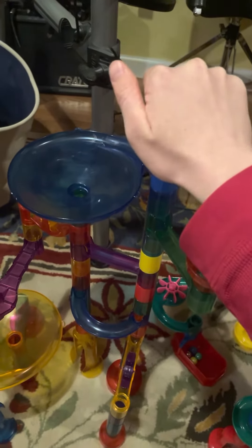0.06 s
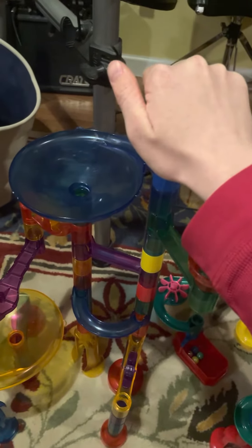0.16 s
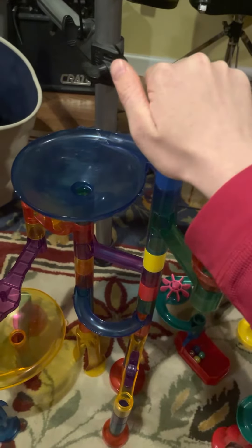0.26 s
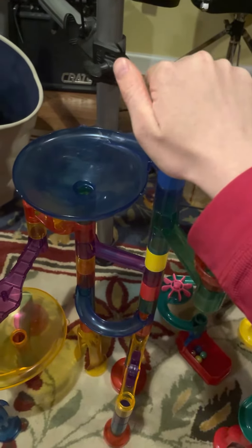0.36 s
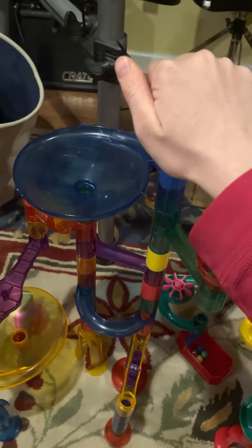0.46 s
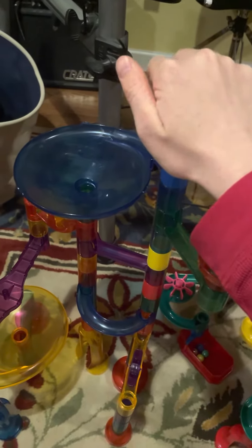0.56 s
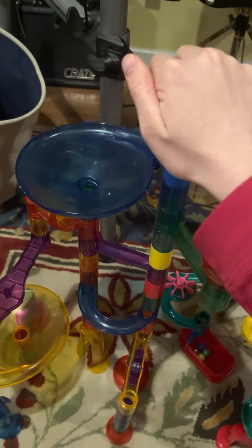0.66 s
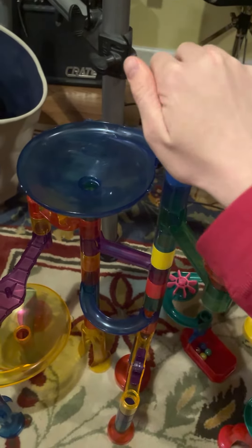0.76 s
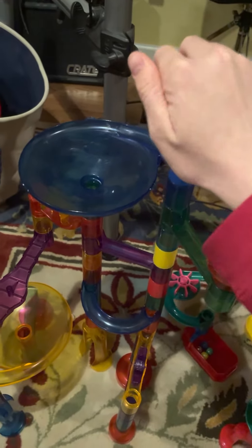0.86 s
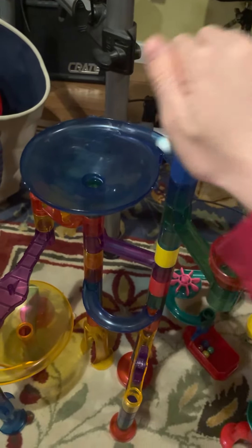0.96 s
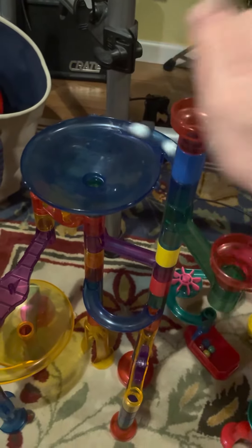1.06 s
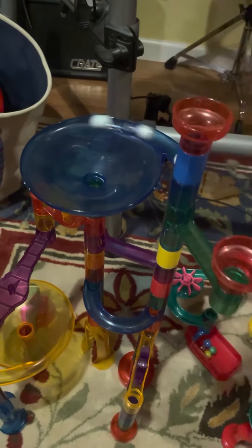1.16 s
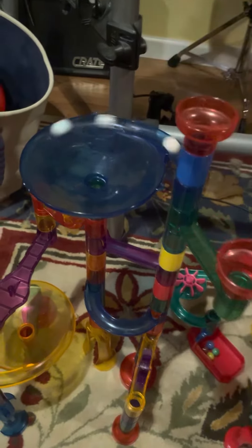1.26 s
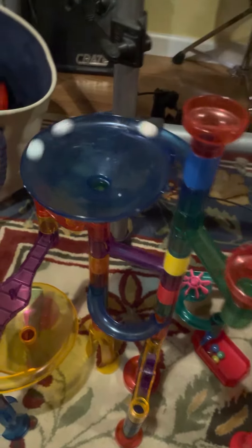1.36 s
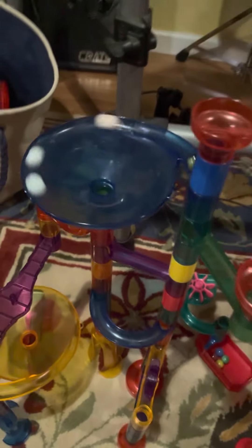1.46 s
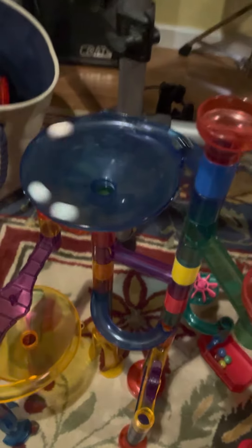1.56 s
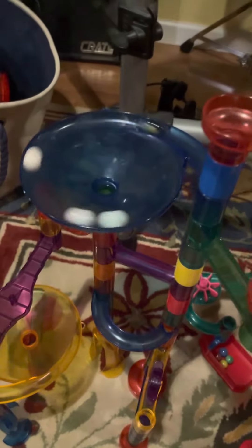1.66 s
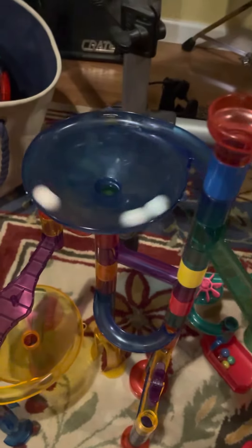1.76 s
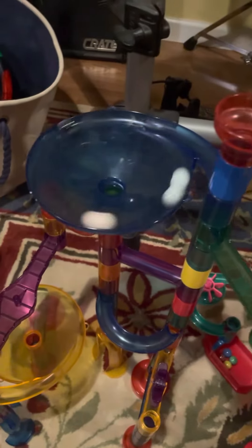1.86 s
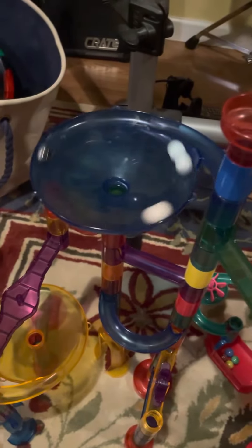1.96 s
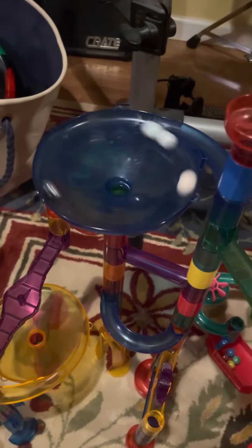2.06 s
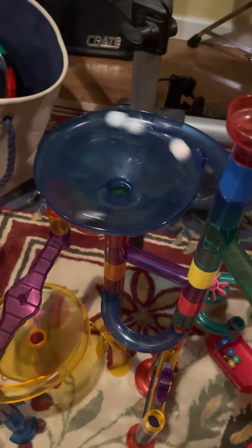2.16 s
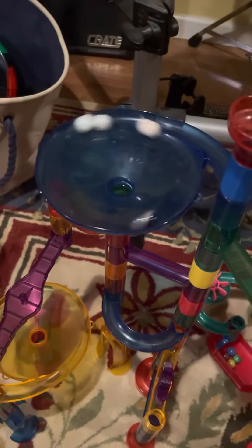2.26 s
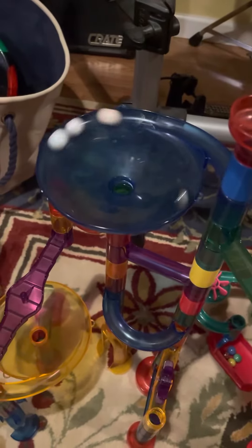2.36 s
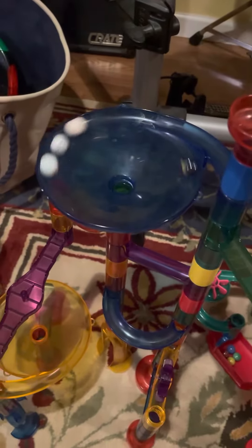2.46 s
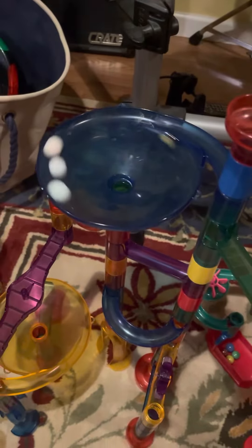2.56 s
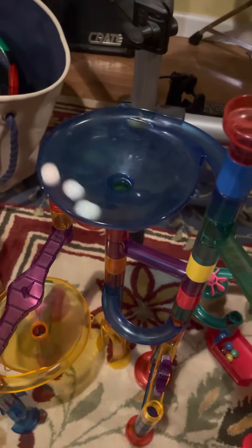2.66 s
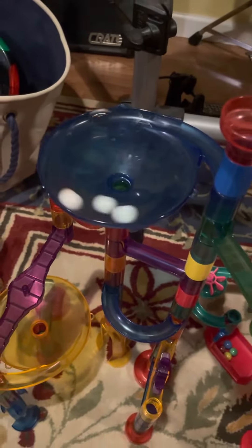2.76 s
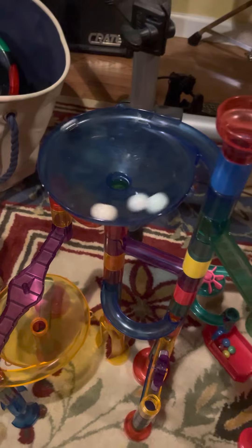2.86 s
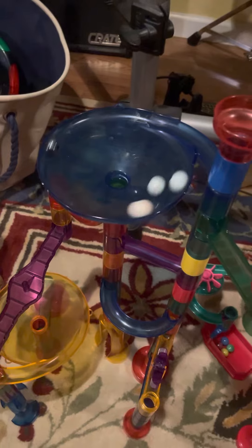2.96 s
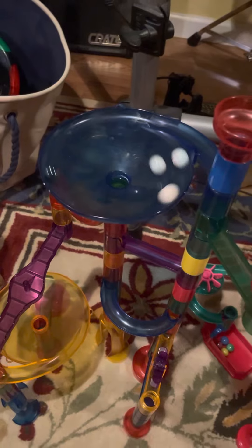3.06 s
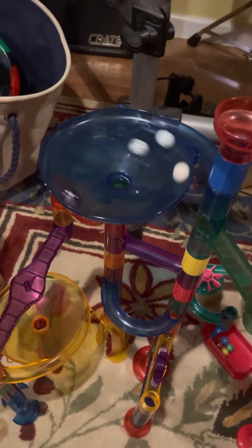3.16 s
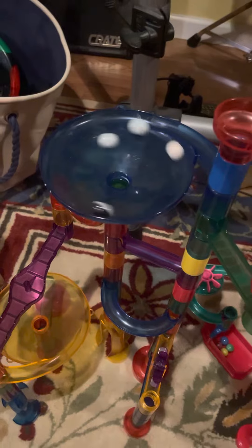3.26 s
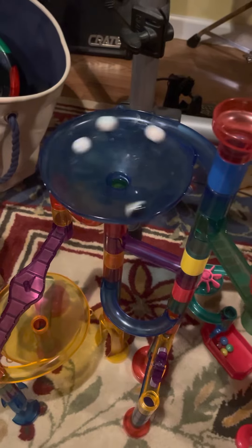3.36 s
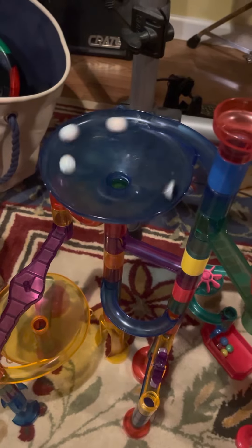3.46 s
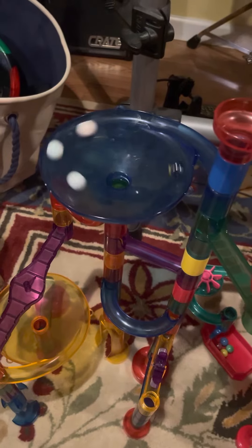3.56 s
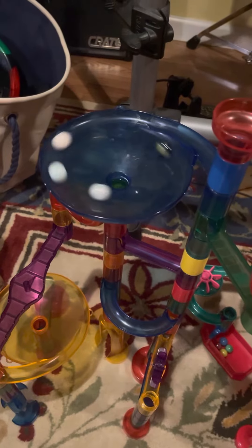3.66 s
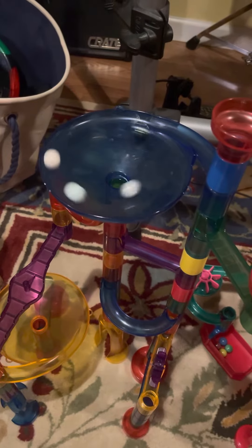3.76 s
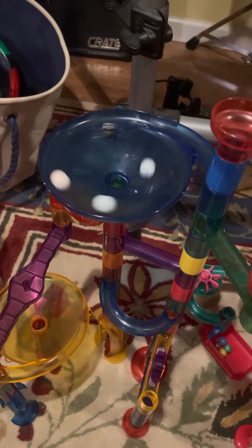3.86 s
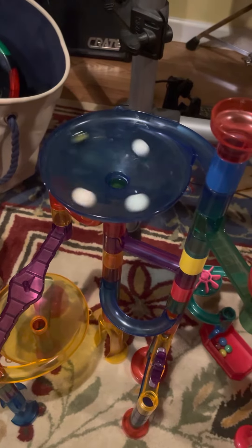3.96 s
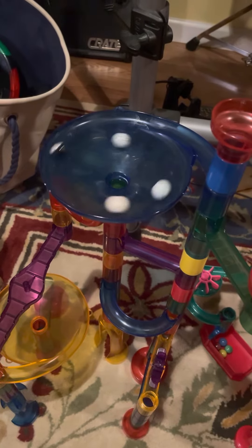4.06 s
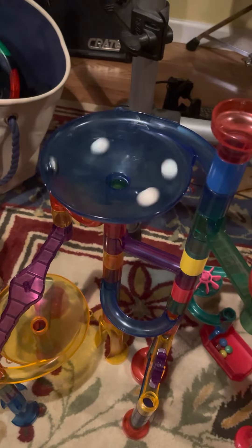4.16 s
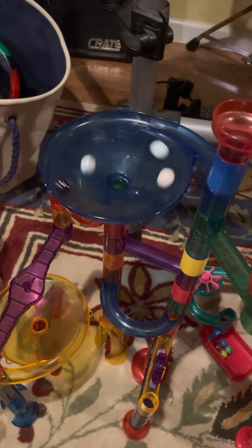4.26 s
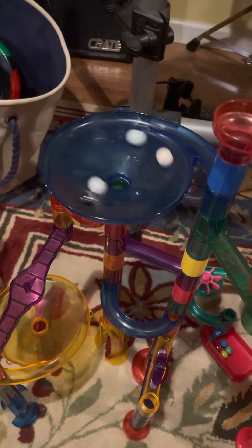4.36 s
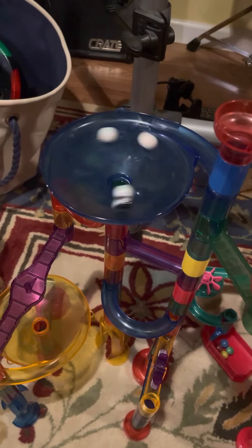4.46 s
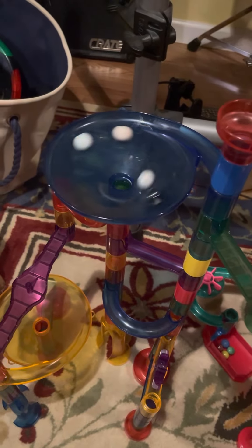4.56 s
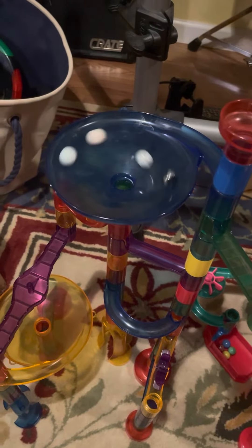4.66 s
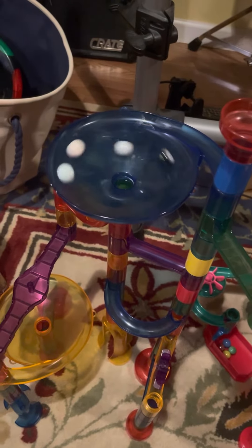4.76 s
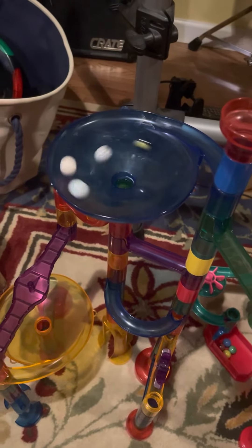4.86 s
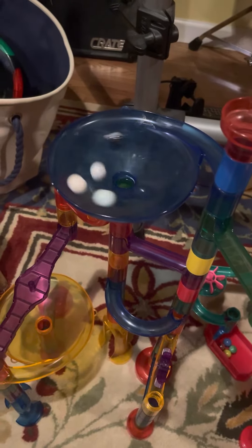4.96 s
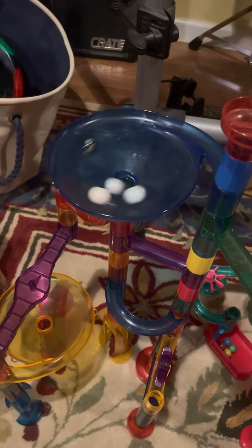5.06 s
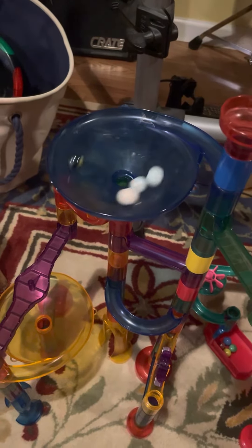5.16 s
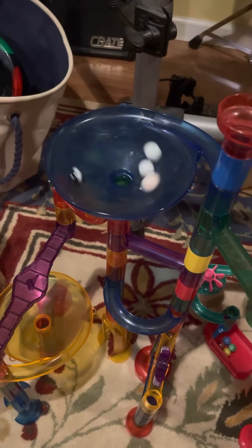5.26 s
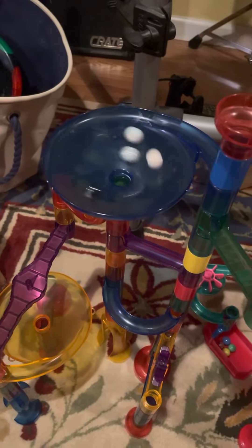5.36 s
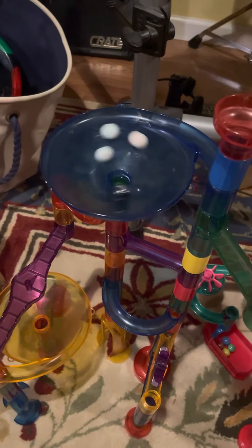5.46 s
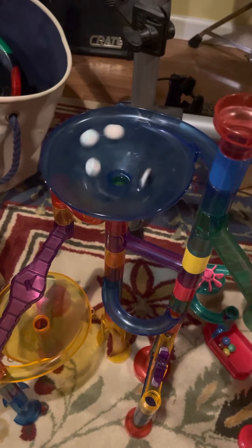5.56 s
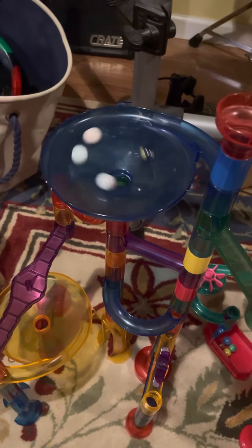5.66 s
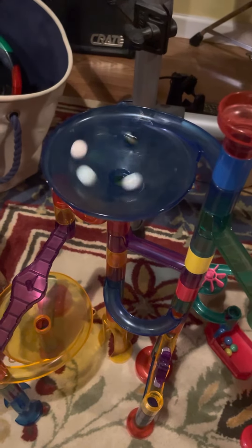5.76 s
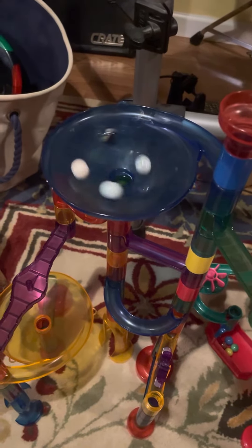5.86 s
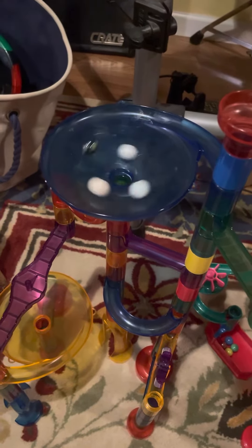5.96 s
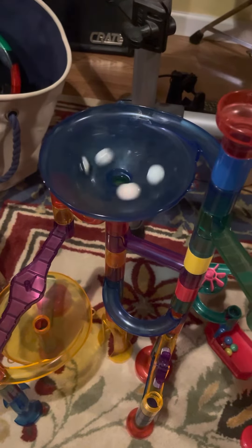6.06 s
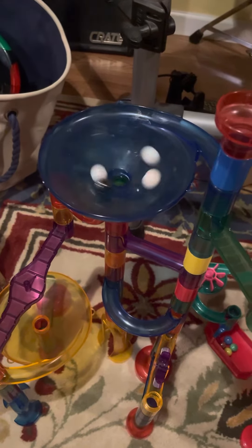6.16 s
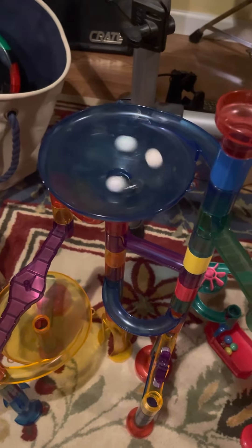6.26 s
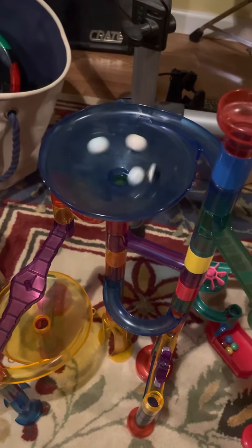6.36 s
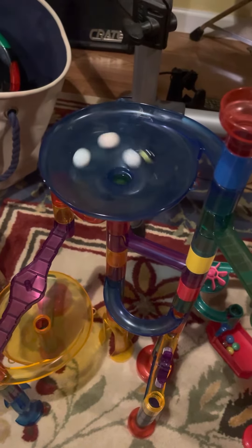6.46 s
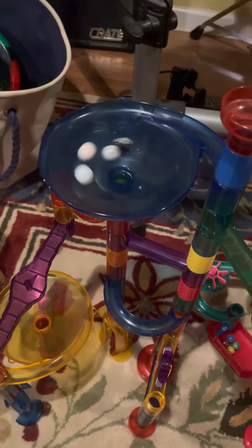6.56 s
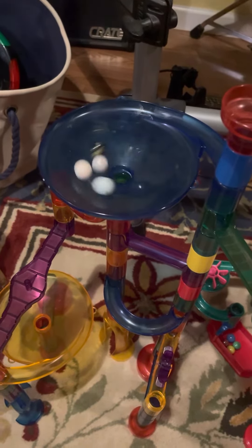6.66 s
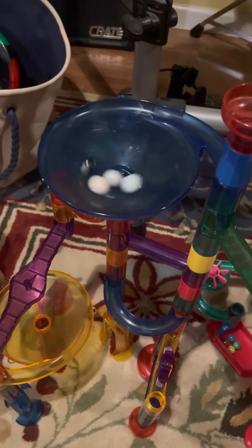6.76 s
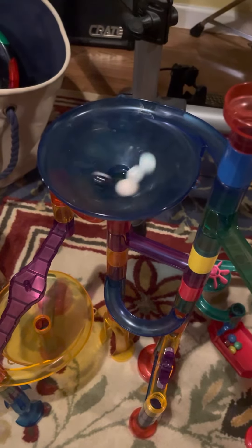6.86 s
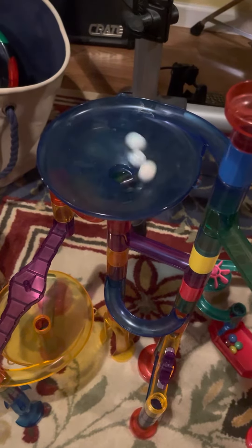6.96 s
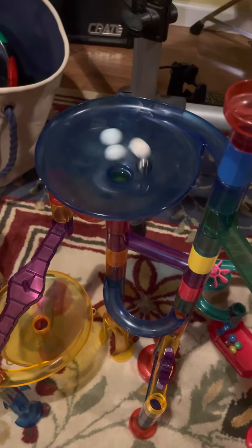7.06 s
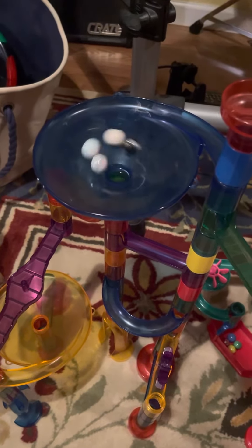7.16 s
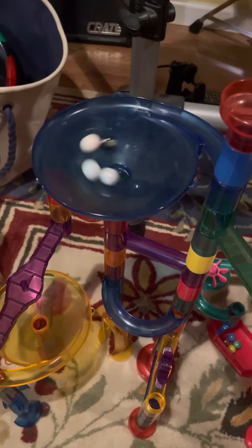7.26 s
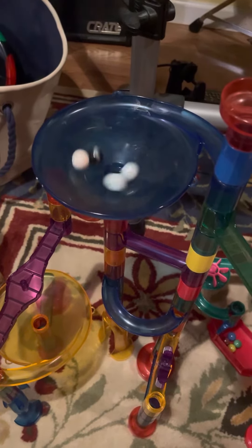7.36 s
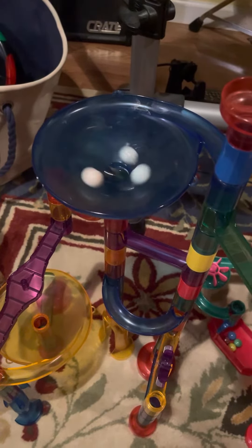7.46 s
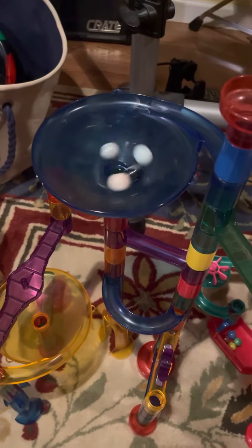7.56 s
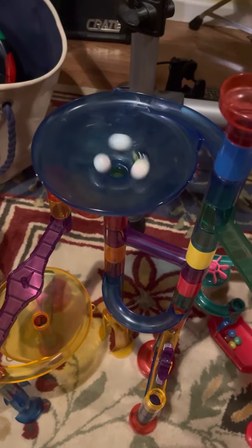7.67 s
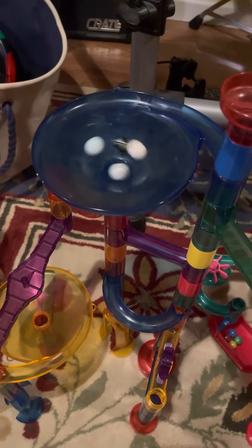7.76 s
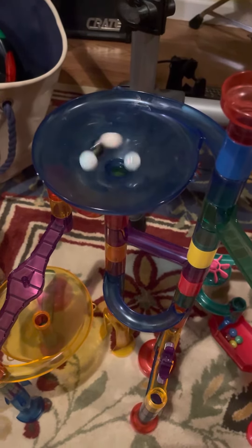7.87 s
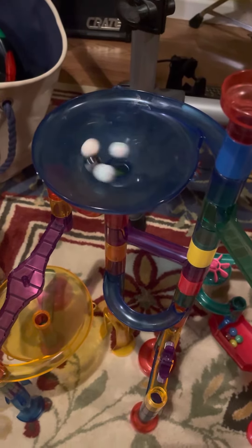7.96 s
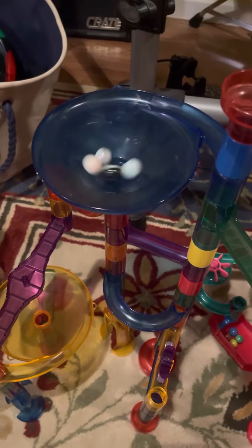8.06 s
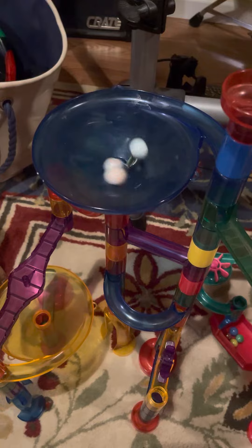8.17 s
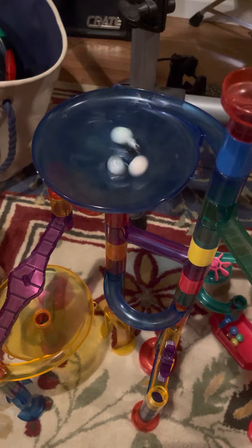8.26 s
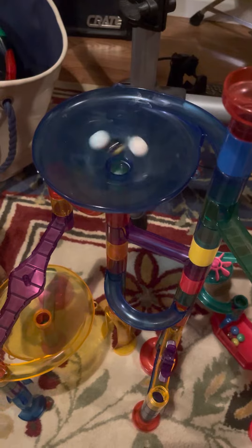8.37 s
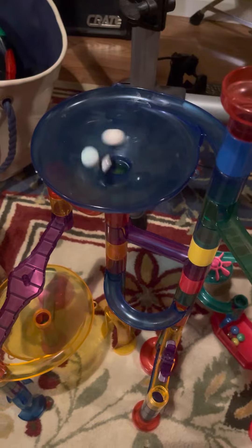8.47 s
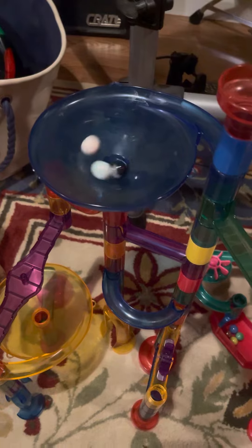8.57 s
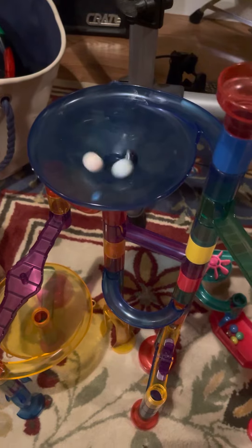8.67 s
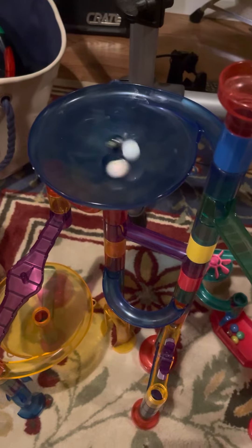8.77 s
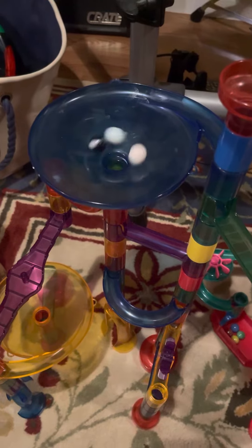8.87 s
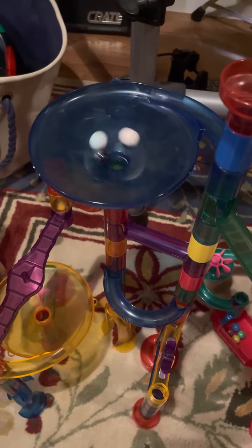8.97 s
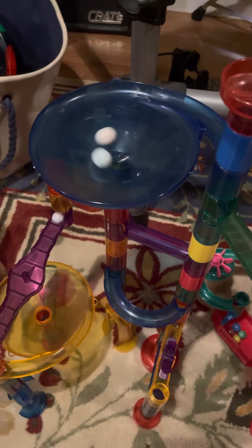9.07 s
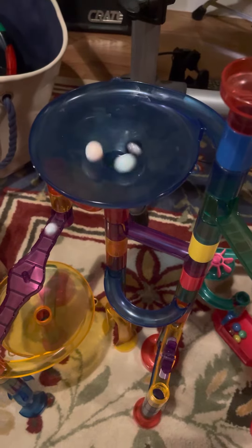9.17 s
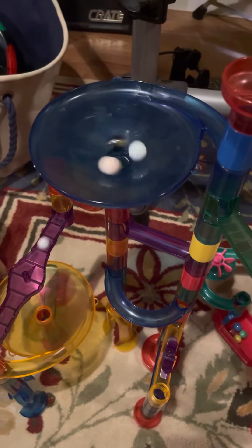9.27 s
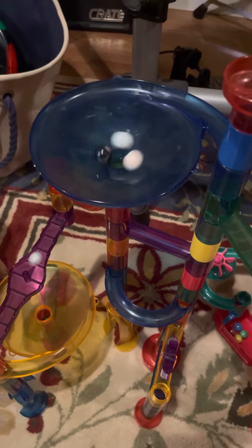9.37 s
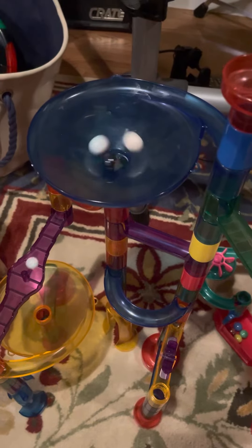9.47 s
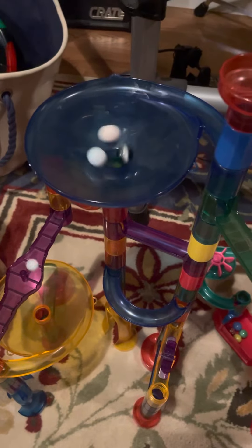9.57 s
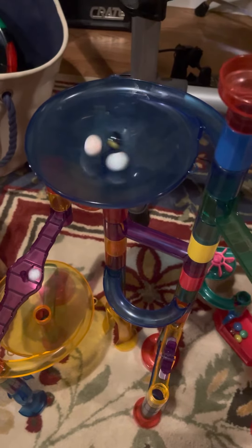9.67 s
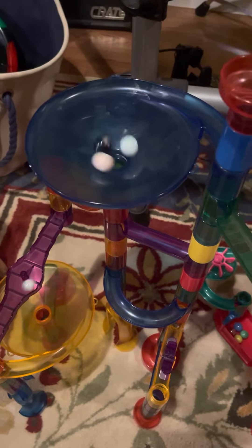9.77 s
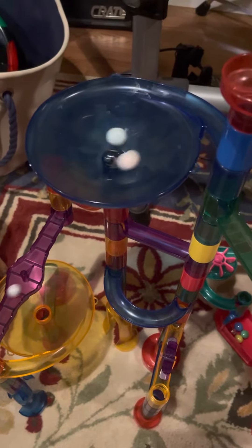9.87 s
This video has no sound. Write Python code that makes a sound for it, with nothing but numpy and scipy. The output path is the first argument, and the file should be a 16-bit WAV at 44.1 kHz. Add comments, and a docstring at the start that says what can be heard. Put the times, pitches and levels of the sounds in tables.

```python
"""Low rumble of a hand-held microphone and faint hiss run throughout in a carpeted room.
Glass marbles are let go and clack down a plastic chute: ringing pieces, cracks, glass pings; dull bumps come and go.
They circle a funnel bowl towards its hole, the rolling's colour shifting: roughness drives the bowl's modes,
collisions tick and knock. Late on they crowd and clack down the tubes.
Bounces add rattle; a shifting diffuse room answers the marbles."""
import sys
import numpy as np
from scipy import signal
from scipy.fft import rfft, irfft, next_fast_len
from scipy.io import wavfile
from scipy.ndimage import uniform_filter1d

SR = 44100
rng = np.random.default_rng(int(sys.argv[2]) if len(sys.argv) > 2 else 0)


def wrap_up_sound(samples):
    """Save the sound to the file named by the first command line argument, as 16-bit audio."""
    columns = np.atleast_2d(samples).T
    # keep every value between -1 and 1, then stretch to whole-number steps
    tamed = np.clip(columns, -1, 1)
    steps = np.round(tamed * 32767).astype(np.int16)
    wavfile.write(sys.argv[1], SR, steps)


N = 437472
TIME = np.arange(N) / SR

# blend of the bowl's colour: time_s, rim_share (1 rim colour .. 0 hole colour)
BOWL_COLOUR = [(0.5, 0.64), (2.0, 1), (3.5, 0.92), (5.0, 0.017), (7.0, 0.15), (9.9, 1)]
# bowl resonances, relative levels: mode_hz, width_hz, rim_db, hole_db
BOWL_MODES = [(532, 44, -8, -9), (571.8, 33.5, -5, -3), (631.3, 38, -6, -2), (663.2, 40, -7.5, -5),
              (712, 61, -8.5, -11), (831, 100, -10, -14), (960, 113, -5.5, -10.5), (1051, 75, -7.5, -10),
              (1242, 110, -3.5, -9.5), (1342, 107, -4, -4), (1469, 213, -6, -0.5), (1596, 137, -6, -2.5),
              (1770, 190, -11, -3.5), (2025, 116, -12, -3.5), (2177, 173, -15, -11),
              (2344, 154, -15.5, -17.5), (2567, 140, -28.5, -22.5), (2860, 370, -20.5, -20.5),
              (3250, 210, -33.5, -29.5), (4170, 610, -32.5, -28), (5390, 170, -32.5, -26),
              (264, 300, -17.5, -14)]
# drops onto plastic; snap and ping relative to strength: start_s, strength_db, snap_db, ping_db, pitch_hz
DROPS = [(0.454, -30.5, -6, -6.5, 1260), (0.4698, -26.5, -7, -9, 1650), (0.4939, -31, -5.5, -9, 2050),
         (0.5109, -36, -7, -6.5, 1500), (0.5258, -33.5, -6, -5.5, 1530), (0.553, -33.5, -1, -4, 2080),
         (0.5584, -26.5, -8, -5.5, 1936), (0.576, -39, 8, -9, 1630), (0.5836, -42, 3, -4.0, 1610),
         (0.594, -21.5, -6, -4.5, 1680), (0.6071, -32.5, -8, -9, 2140), (0.6249, -32, -2, 4, 1410),
         (0.632, -23, -3.5, -3, 1616), (0.665, -27, -12.5, -6, 1960), (0.679, -26, -11, -12, 1790),
         (0.7265, -38, -17, -18, 1660), (0.7439, -25.0, -10, -9, 1700), (0.7507, -23.5, -6, -3.5, 1930),
         (0.776, -32, -3, -3, 1490), (0.7857, -28.5, -14, -10, 2110), (0.7947, -29.5, -9, -8.5, 1750),
         (0.803, -32.5, -6, -6, 1730), (0.8236, -31, -15, -19.0, 2130), (0.8364, -22.5, -6, -10.5, 1870),
         (0.8971, -33.5, -1, -3, 2130), (0.9025, -24.5, -13.0, -11.5, 2050),
         (0.9135, -30.5, -2.5, -14, 1450), (0.9182, -35, -3.5, -11, 1500), (0.9232, -31, -6, -8.5, 1940),
         (0.9562, -31.5, -6, -19, 1420), (0.9767, -38, -5, -7, 2110), (0.9851, -31.5, -2.5, -12.5, 1930),
         (0.998, -42, -16, -9, 1400), (1.031, -45, -7, -6, 1530), (1.0574, -28.5, -5, -11, 2030),
         (1.0703, -33, -4.5, -11.5, 1460), (1.112, -29, -8, -15, 1090), (1.1863, -32, -11, -15, 1230),
         (8.193, -34.5, -13.5, -17, 1660), (8.2612, -37.5, -14.5, -13, 1830),
         (8.2681, -32.0, -19, -24, 1570), (8.2967, -32.5, -16, -14, 2000), (8.3042, -39.5, -3.5, -2, 1870),
         (8.3121, -31.5, -14.0, -15, 2040), (8.3427, -27, -15, -10, 1990), (8.3725, -21.5, -11, -11, 1520),
         (8.3845, -24.5, -13, -11.0, 2000), (8.4272, -18.5, -8.5, -11, 1390),
         (8.4379, -38, -10, -2.5, 1890), (8.4694, -26, -16.0, -25.0, 1480), (8.4885, -37, -15.5, -15, 1740),
         (8.5882, -27, -9, -17.5, 1400), (8.658, -41.5, -15, -14, 990), (8.7407, -35, -7.5, -19, 1760),
         (8.7675, -29, -14, -17, 1550), (8.852, -26.5, -2.5, -7.5, 3220), (8.8782, -34.5, -10, -16, 1550),
         (8.897, -44, -10, -8.5, 1610), (8.9268, -32, -13, -6, 1480), (8.937, -25.5, -14, -19, 1510),
         (8.9606, -27.5, -2, -9, 1460), (9.0044, -33, -3, -10, 1590), (9.132, -35.5, -8, -9, 1370),
         (9.2278, -31.5, -7.5, -10, 2260), (9.316, -30.5, -4.5, -11.5, 1810),
         (9.3823, -33.5, -1, -10.5, 2570), (9.4075, -39.5, -4, -6, 1540), (9.4592, -42.5, -4, -11.5, 1490),
         (9.5738, -42, -4, -15, 1530), (9.5917, -33, -11, -14.5, 2610), (9.723, -37.5, -23.5, -32.5, 1390),
         (9.7505, -30.5, -3.5, -11, 1590), (9.8813, -51, -3, 0, 1610), (9.893, -29.0, -5, -14, 1510)]
# collisions in the bowl, relative levels: start_s, glass_tick_db, bowl_knock_db
COLLISIONS = [(1.2126, -59, -27), (1.4056, -47.5, -30), (1.496, -47, -50.5), (1.6241, -55, -27.5),
              (1.7965, -66, -28), (1.9535, -52, -56.5), (2.0246, -46, -35), (2.1574, -39.5, -26),
              (2.203, -58, -44), (2.3231, -46, -25), (2.7103, -43.5, -31.5), (2.812, -54, -36.5),
              (3.49, -64, -33), (4.282, -59, -35), (4.411, -44, -50), (4.49, -54.5, -33.5),
              (4.757, -54, -40), (4.857, -55, -43), (5.1227, -51, -35), (5.337, -64, -42),
              (5.795, -53.5, -34.5), (6.218, -54, -33), (6.336, -67, -36), (6.405, -54.5, -36),
              (6.5087, -50, -33), (6.579, -52.5, -40), (6.728, -54, -35), (6.824, -57, -36),
              (6.8504, -53, -34), (6.8792, -51.5, -31.5), (6.966, -56, -43), (7.016, -57, -32.5),
              (7.0646, -50, -32), (7.1284, -51, -32), (7.3009, -53.5, -35.5), (7.439, -57, -37.5),
              (7.471, -51.5, -33), (7.5592, -52, -32), (7.603, -47, -41), (7.98, -75, -38.5),
              (8.0365, -56, -36), (8.0755, -46.5, -51.5), (8.1403, -75, -37.5), (9.8443, -48.5, -54)]
# ring of the plastic pieces, relative levels: mode_hz, width_hz, level_db
PLASTIC_MODES = [(561, 37, -6.5), (740, 80, -10), (972, 120, -3.5), (1420, 160, 2), (1644, 390, 2.5),
                 (2074, 120, -2.5), (2395, 220, -3), (2710, 840, 0), (3110, 420, 1.5), (4150, 1660, 0),
                 (4970, 1400, -12.5), (6230, 230, -18.5), (10100, 2900, -27)]
# glass colour: freq_hz, relative_db
GLASS_COLOUR = [(1500, -2.5), (3500, 6), (5000, -1), (6000, 8), (7000, -5), (8000, -18.5), (10000, -20.5),
                (12500, -39), (15000, -39.5)]
# bumps on the microphone: start_s, level_db, start_pitch_hz, fade_s, scuff_db
MIC_BUMPS = [(0.752, -22.5, 298, 0.13, -45), (0.871, -19, 228, 0.056, -42), (0.893, -23.5, 242, 0.11, -49),
             (1.057, -22.5, 305, 0.099, -52), (4.542, -19.5, 223, 0.033, -56),
             (5.213, -35, 270, 0.036, -45.5), (5.285, -33, 268, 0.052, -45), (5.809, -18, 249, 0.037, -34),
             (5.834, -17, 197, 0.059, -46), (5.881, -14, 430, 0.06, -45), (6.922, -35, 386, 0.05, -41),
             (6.957, -25, 343, 0.036, -47), (8.204, -30.5, 109, 0.089, -65),
             (8.279, -21.5, 454, 0.042, -36.5), (8.572, -30.5, 204, 0.03, -48.5),
             (8.775, -26, 156, 0.084, -55), (9.305, -25, 231, 0.024, -47), (9.359, -21, 403, 0.022, -58),
             (9.897, -30.5, 349, 0.031, -37)]
# rumble colour: freq_hz, relative_db_per_hz
RUMBLE_COLOUR = [(20, -28.5), (32, -15.5), (42, -1.5), (57, -1.5), (72, -9.5), (100, -20), (140, -27),
                 (200, -36.5), (300, -51.5), (1100, -70), (6000, -100)]
# hiss colour: freq_hz, relative_db_per_hz
HISS_COLOUR = [(300, 6.5), (750, -1.5), (1150, 2), (1600, -4), (2100, 1), (2800, -10.5), (3400, 5.5),
               (3800, -8.5), (6000, -18.5), (14000, -12.5)]
# port level difference: freq_hz, left_minus_right_db
PORT_BALANCE = [(100, -1.5), (450, -4), (580, -6.5), (800, -10), (1050, 2.5), (1230, 4), (1600, 3),
                (1950, -6.5), (2180, 12.5), (2500, -7), (4200, -2.5), (5300, 1), (9000, -0.5)]
# port phase difference: freq_hz, left_lead_rad
PORT_LEAD = [(30, 0), (70, -.15), (140, -.65), (250, -.7), (420, .4), (560, .5), (1100, 1.7), (1350, 1),
             (1700, 3), (2050, 6.2), (2400, 6.5), (2700, 9.1), (4400, 10.2), (7500, 15.7), (8700, 16.2),
             (10500, 18.7), (12200, 19.1), (14000, 22)]
# room decay: freq_hz, t60_s
ROOM_DECAY = [(300, 0.21), (1000, 0.17), (3000, 0.2), (6000, 0.099), (12000, 0.13)]
# marble speed, heard as rolling level: time_s, level_db
ROLL_SPEED = [(0.46, -41), (1.0, -39.5), (1.2, -37), (1.6, -37.5), (2.0, -39), (2.65, -41.5), (3.3, -43.5),
              (3.75, -42.5), (4.2, -45), (4.98, -41), (5.1, -42.5), (5.3, -41.5), (5.92, -45.5),
              (6.05, -42.5), (6.6, -43.5), (7.1, -42.5), (7.24, -47), (7.33, -44), (7.41, -47), (7.52, -42),
              (7.95, -46), (8.21, -42), (8.56, -51), (8.72, -42.5), (8.85, -50.5), (9.1, -42.5),
              (9.2, -47.5), (9.9, -47.5)]
# crowding in the chute, then in throat and tubes: peak_s, rattle_db, build_db_per_s, thinning_db_per_s
CROWDS = [(0.6, -36.5, 71, 129), (0.679, -35, 199, 31.5), (8.26, -46.5, 118, 47), (8.41, -60, 69, 110),
          (8.9, -55, 154, 68)]
# ring of the entry chute: mode_hz, width_hz, level_db
CHUTE_MODES = [(2160, 150, -5), (5640, 120, 4.5), (5960, 140, 2.5)]

RELEASE_S, BOWL_S, DRAIN_S = 0.455, 1.2, 8.15
SWAY_PER_S, SWAY_DB = 16, 1
RATTLE_UNDER_ROLL_DB, RATTLE_SWAY_DB = -17, 3.5
# bounces after a blow: levels relative to the blow, amplitude decay time
BOUNCE_RATTLE_DB, BOUNCE_ROLL_DB, BOUNCE_S = -18, -17, 0.028
# a tick further above its knock than this gains treble per dB of excess
CLEAN_HIT_DB, SHEEN_PER_DB = 2.5, 5.5
CUTOFF_HZ = 15800


def from_db(db):
    """Decibels to gain."""
    return 10 ** (np.asarray(db) / 20)


def rms_one(x):
    """Scale to unit power."""
    return x / np.sqrt(np.mean(x ** 2) + 1e-20)


def at_hz(points, hz):
    """Read a table on a log-frequency axis."""
    table_hz, value = np.transpose(points)
    return np.interp(np.log(hz + 1e-9), np.log(table_hz), value)


def coloured(x, spectrum):
    """Shape a signal by a spectrum in dB."""
    size = x.shape[-1]
    gain = from_db(at_hz(spectrum, np.fft.rfftfreq(size, 1 / SR)))
    return irfft(rfft(x) * gain, size)


def drift(rate_per_s):
    """Random line through unit-spread knots, rate_per_s knots a second."""
    knots = rng.standard_normal(4096)
    return np.interp(TIME * rate_per_s, np.arange(len(knots)), knots)


def resonate(x, hz, width_hz):
    """Two-pole resonance with gain about 1 at its peak."""
    r = np.exp(-np.pi * width_hz / SR)
    b = np.array([1, 0, -1]) * (1 - r * r) / 2
    a = [1, -2 * r * np.cos(2 * np.pi * hz / SR), r * r]
    return signal.lfilter(b, a, x + 1e-18)


def butter(x, hz, kind, order=2):
    """Causal Butterworth filter."""
    return signal.sosfilt(signal.butter(order, hz, kind, fs=SR, output="sos"), x)


def add(track, start_s, sound):
    """Mix a sound into a track at a time."""
    at = max(round(start_s * SR), 0)
    track[at:at + len(sound)] += sound[:max(N - at, 0)]


def background(rumble_db=-42.5):
    """Low rumble of the hand-held microphone: coloured noise."""
    return from_db(rumble_db) * rms_one(coloured(rng.standard_normal(N), RUMBLE_COLOUR))


def air(hiss_db=-75.5):
    """Faint room hiss: coloured noise, unrelated at the two ports."""
    return from_db(hiss_db) * rms_one(coloured(rng.standard_normal((2, N)), HISS_COLOUR))


def reflections(build_s=0.00017, treble_db_per_decade=-0.5):
    """Diffuse room response from one spot: noise per port, dying band by band."""
    t, edges_hz = TIME[:SR // 2], np.geomspace(200, 16000, 8)
    tail = 0
    for low_hz, high_hz in zip(edges_hz, edges_hz[1:]):
        mid_hz = np.sqrt(low_hz * high_hz)
        noise = butter(rng.standard_normal((2, len(t))), [low_hz, high_hz], "band")
        decay = np.exp(-np.log(1000) * t / at_hz(ROOM_DECAY, mid_hz))
        tail = tail + noise * decay * from_db(treble_db_per_decade * np.log10(mid_hz / edges_hz[0]))
    return rms_one(tail * (1 - np.exp(-t / build_s))) / np.sqrt(len(t))


def room(x, count=4):
    """Moving marbles: the reflection pattern drifts between several spots at constant total power."""
    shares = np.array([drift(20) for _ in range(count)])
    shares /= np.linalg.norm(shares, axis=0)
    return sum(signal.oaconvolve((x * share)[None], reflections(), axes=1)[:, :N] for share in shares)


def ports(x):
    """Two microphone ports: level and phase differ by frequency, split evenly between the sides."""
    size = next_fast_len(N + 4096)
    hz, side = np.fft.rfftfreq(size, 1 / SR), np.array([[.5], [-.5]])
    gain = from_db(side * at_hz(PORT_BALANCE, hz))
    phase = np.exp(1j * side * at_hz(PORT_LEAD, hz))
    return irfft(rfft(x, size) * gain * phase, size)[:, :N]


def bumps(rest_hz=52, glide_s=0.0074, swell_s=0.019, scuff_s=0.0211, scuff_hz=(80, 195)):
    """Knock through the microphone body: swelling sine gliding to bass; fingers scuff as low noise."""
    out, t = np.zeros(N), TIME[:SR // 4]
    swell = (t / swell_s) ** 2
    for start_s, level_db, start_hz, fade_s, scuff_db in MIC_BUMPS:
        hz = rest_hz + (start_hz - rest_hz) * np.exp(-t / glide_s)
        envelope = 2 * swell / (1 + swell ** 2) * np.exp(-(t / fade_s) ** 2)
        add(out, start_s, from_db(level_db) * envelope * np.sin(2 * np.pi * np.cumsum(hz) / SR))
        scuff = rms_one(butter(rng.standard_normal(len(t)), scuff_hz, "band", order=4))
        add(out, start_s - scuff_s, from_db(scuff_db) * scuff * np.exp(-(t / scuff_s - 2) ** 2))
    return out


def chute_ring(x, fade_s=0.72):
    """Entry chute: resonances driven by the clatter, fading out by BOWL_S."""
    inside = x * np.clip((BOWL_S - TIME) / fade_s, 0, 1)
    return sum(from_db(db) * resonate(inside, hz, width_hz) for hz, width_hz, db in CHUTE_MODES)


def crack(length_s, rise_s, count=4096):
    """Force of a blow: noise with a fast rise and Gaussian fall."""
    t = np.arange(count) / SR
    return rng.standard_normal(count) * (1 - np.exp(-t / rise_s)) * np.exp(-(t / length_s) ** 2)


def plastic(force, scatter_db):
    """Ring of the plastic pieces; mode levels scatter with the spot hit."""
    spot_db = rng.normal(0, 1, len(PLASTIC_MODES)) * scatter_db
    out = 0
    for k, (hz, width_hz, db) in enumerate(PLASTIC_MODES):
        gain = (-1) ** k * from_db(db + spot_db[k]) / np.sqrt(width_hz)
        out = out + gain * resonate(force, hz, width_hz)
    return out


def bowl_modes(time_s):
    """(hz, width_hz, gain) of the bowl modes, blended between rim and hole colour at that time."""
    rim_share = np.clip(np.interp(time_s, *np.transpose(BOWL_COLOUR)), 0, 1)
    return [(hz, width_hz, from_db(hole_db + (rim_db - hole_db) * rim_share))
            for hz, width_hz, rim_db, hole_db in BOWL_MODES]


def grazes(tick_db=-61.0, knock_db=-45.0, spread_db=2.0, count=20):
    """Light chance touches while circling: rows of start_s, glass_tick_db, bowl_knock_db."""
    times_s = BOWL_S + (DRAIN_S - BOWL_S) * rng.random(count)
    force_db = spread_db * rng.standard_normal(count)
    return list(zip(times_s, tick_db + force_db, knock_db + force_db))


def ticks(length_s=0.0027, rise_s=0.00022, knock_s=0.0054, knock_trim_db=-3.5, count=320):
    """Glass on glass: a short bright noise tick, and the jolt knocks the bowl's modes."""
    out = np.zeros(N)
    for start_s, tick_db, knock_db in COLLISIONS + grazes():
        sheen_db = SHEEN_PER_DB * max(tick_db - knock_db - CLEAN_HIT_DB, 0)
        tick = coloured(crack(length_s, rise_s), GLASS_COLOUR)
        tick = coloured(tick, [(6500, 0.0022), (9000, sheen_db)])[:count]
        knock = 0
        for hz, width_hz, gain in bowl_modes(start_s):
            knock = knock + gain / np.sqrt(width_hz) * resonate(crack(knock_s, rise_s), hz, width_hz)
        knock = butter(knock, [480, 2600], "band", order=3)
        add(out, start_s, from_db(tick_db) * rms_one(tick))
        add(out, start_s, from_db(knock_db + knock_trim_db) * knock / np.std(knock[:count]))
    return out


def clacks(length_s=0.0036, rise_s=0.00014, contact_s=0.00048, ping_s=0.0028, ping_rise_s=0.0015,
           scatter_db=2.5, piece_q=6.3, thud_db=-22.0, ping_hz=(4900, 6700),
           sheen_hz=(8300, 12500), sheen_db=-12.0, tube_sheen_db=-0.5, count=256):
    """A drop rings the struck piece at its pitch and cracks through the tower; glass adds ping and sheen."""
    out = np.zeros(N)
    for start_s, strength_db, snap_db, ping_db, piece_hz in DROPS:
        force = crack(length_s * rng.uniform(0.95, 1.17), rise_s)
        touch = crack(ping_s, ping_rise_s)
        ring = butter(plastic(force, scatter_db), 406, "high", order=3)
        tower = butter(ring, 2550, "low", order=7)
        snap = butter(ring, [2700, 4800], "band", order=3)
        piece = resonate(crack(contact_s, rise_s), piece_hz, piece_hz / 2)
        piece = resonate(piece, piece_hz, piece_hz / piece_q)
        body = tower / np.std(tower[:count]) + piece / np.std(piece[:count])
        thud = resonate(butter(force, 540, "low"), 290, 270)
        ping = butter(touch, ping_hz, "band", order=3)
        sheen = butter(touch, sheen_hz, "band")
        top_db = ping_db + sheen_db + tube_sheen_db * (start_s > DRAIN_S)
        parts = (body, 0), (thud, thud_db), (snap, snap_db), (ping, ping_db), (sheen, top_db)
        for part, db in parts:
            add(out, start_s, from_db(strength_db + db) * part / np.std(part[:count]))
    return out


def contacts(per_s, spread_db):
    """Random tiny impacts of either sign, most weak and a few strong."""
    sizes = from_db(spread_db * np.minimum(rng.exponential(1, N), 4))
    return (rng.random(N) < per_s / SR) * sizes * rng.choice([-1, 1], N)


def skips(per_s=170, spread_db=2.5, length_s=0.0014, smooth_share=0.36):
    """Contact pressure of unit power: a steady share plus short bursts from hopping marbles' landings."""
    power = contacts(per_s, spread_db) ** 2
    landings = signal.lfilter([1], [1, -np.exp(-1 / (length_s * SR))], power + 1e-18)
    return np.sqrt(smooth_share + (1 - smooth_share) * landings / landings.mean())


def bouncing():
    """Power of the bounces that follow each listed drop and collision, decaying exponentially."""
    blows = np.zeros(N)
    drops = [(start_s, strength_db) for start_s, strength_db, *_ in DROPS]
    knocks = [(start_s, knock_db) for start_s, _, knock_db in COLLISIONS]
    for start_s, db in drops + knocks:
        add(blows, start_s, from_db([db]) ** 2)
    return signal.lfilter([1], [1, -np.exp(-2 / (BOUNCE_S * SR))], blows + 1e-18)


def motion():
    """Gains of rolling and rattling: both follow speed, sway and bounces; crowding adds rattle."""
    speed_db = np.interp(TIME, *np.transpose(ROLL_SPEED))
    sway, bounces = drift(SWAY_PER_S), bouncing()
    crowd = 0
    for peak_s, db, build, thin in CROWDS:
        below_db = np.maximum(build * (peak_s - TIME), thin * (TIME - peak_s))
        crowd = crowd + from_db(db - below_db) ** 2
    roll = from_db(speed_db + SWAY_DB * sway) ** 2 + from_db(BOUNCE_ROLL_DB) ** 2 * bounces
    rattle = from_db(speed_db + RATTLE_UNDER_ROLL_DB + RATTLE_SWAY_DB * sway) ** 2
    rattle = rattle + from_db(BOUNCE_RATTLE_DB) ** 2 * bounces + crowd
    return np.sqrt([roll, rattle]) * (TIME >= RELEASE_S)


def rattling(pressure, glass_db=-8.5, bowl_plastic_db=-7.0, tube_glass_db=2.5):
    """Marbles chatter as glass noise and knock plastic walls; walls drop in the bowl, glass rises in the tubes."""
    knocks = skips(per_s=140, spread_db=0.0, length_s=0.0016, smooth_share=0.35)
    walls = rms_one(butter(plastic(pressure * knocks * rng.standard_normal(N), 0), 450, "high"))
    clinks = skips(per_s=290, spread_db=5.5, length_s=0.0027, smooth_share=0.55)
    glass = rms_one(coloured(pressure * clinks * rng.standard_normal(N), GLASS_COLOUR))
    in_tubes = np.interp(TIME, [8.1, 8.25], [0, 1])
    in_bowl = np.interp(TIME, [1.0, 1.3], [0, 1]) - in_tubes
    return walls * from_db(bowl_plastic_db * in_bowl) + glass * from_db(glass_db + tube_glass_db * in_tubes)


def rolling(pressure, per_s=4500, spread_db=1.8, sway_db=0.5, flutter_db=1.0, flutter_per_s=60,
            bend_s=0.000499, even_s=0.06):
    """Roughness drums on the bowl; modes swell, flutter and bend in pitch at random, total level evened."""
    force = contacts(per_s, spread_db) * pressure
    out = np.zeros(N)
    for hz, width_hz, gain in bowl_modes(TIME):
        mode = resonate(force * rng.choice([-1, 1], N), hz, width_hz)
        mode = rms_one(resonate(mode, hz, width_hz))
        mode = np.interp(TIME + bend_s * drift(14), TIME, mode)  # a drifting delay bends the pitch
        level_db = sway_db * drift(11) + flutter_db * drift(flutter_per_s)
        out += rms_one(mode * from_db(level_db)) * gain
    return out / np.sqrt(uniform_filter1d(out ** 2, int(even_s * SR)) + 1e-9)


def scene(roll_room_db=-7.0, hit_room_db=-7.0):
    """The marble run close by, the room around it."""
    roll_level, rattle_level = motion()
    pressure = skips()
    roll = roll_level * rolling(pressure) + rattle_level * rattling(pressure)
    hits = clacks() + ticks()
    roll = roll + chute_ring(roll)
    hits = hits + chute_ring(hits)
    near = ports(roll + hits + bumps() + background())
    return near + air() + room(from_db(roll_room_db) * roll + from_db(hit_room_db) * hits)


def record(dry, soft_top_hz=11800):
    """The microphone dulls the very top; a steep low-pass is 70 dB down from CUTOFF_HZ."""
    dull = butter(dry, soft_top_hz, "low", order=8)
    return signal.sosfilt(signal.cheby2(12, 70, CUTOFF_HZ, fs=SR, output="sos"), dull)


dry = scene()
out = record(dry)
wrap_up_sound(out)
```